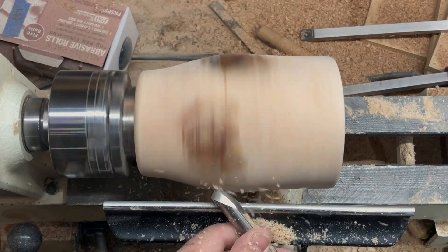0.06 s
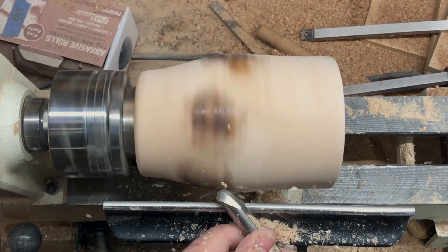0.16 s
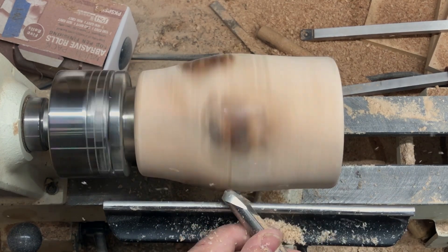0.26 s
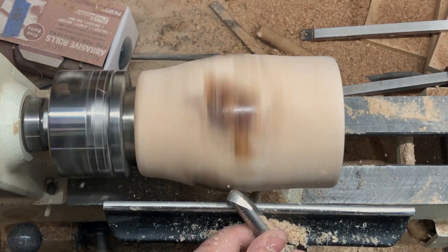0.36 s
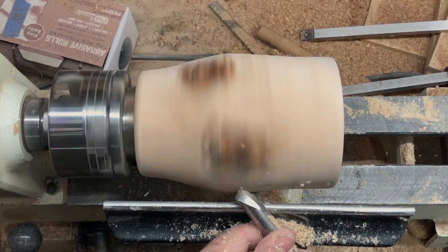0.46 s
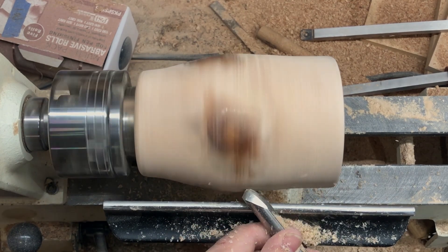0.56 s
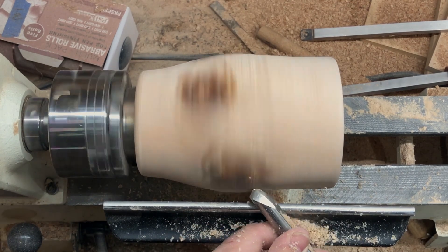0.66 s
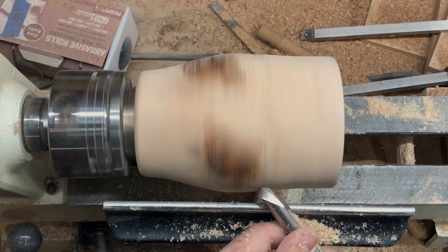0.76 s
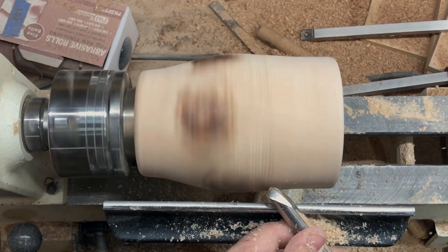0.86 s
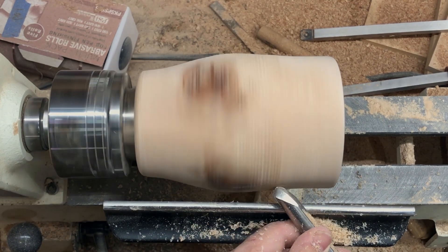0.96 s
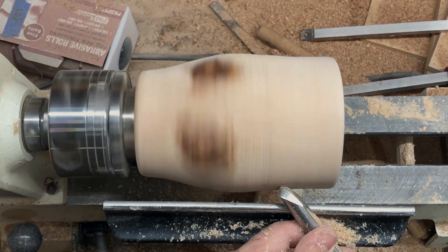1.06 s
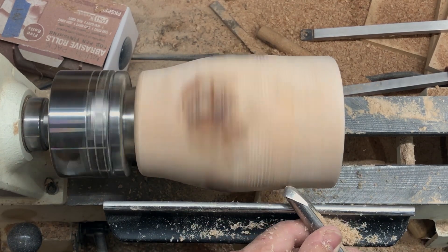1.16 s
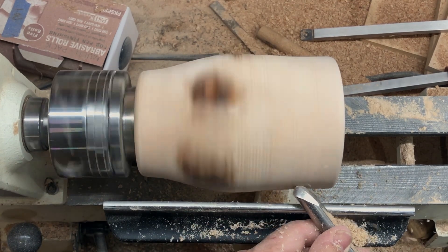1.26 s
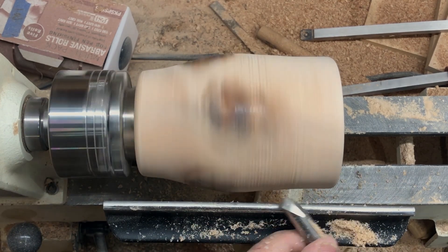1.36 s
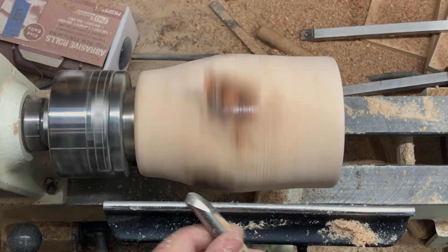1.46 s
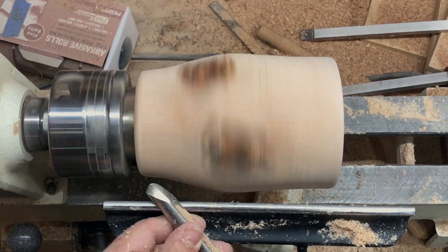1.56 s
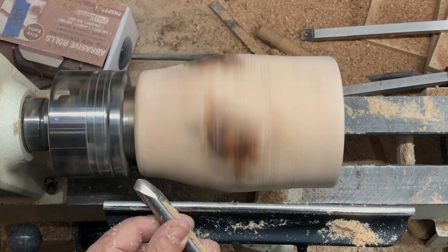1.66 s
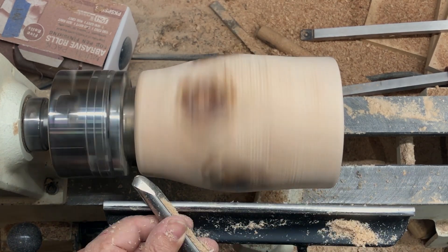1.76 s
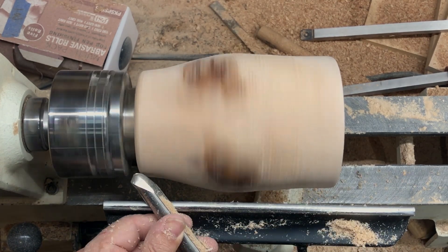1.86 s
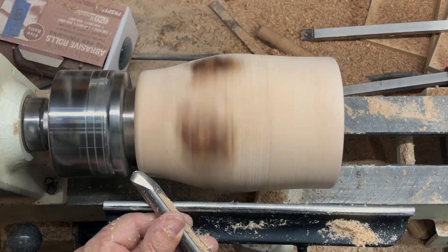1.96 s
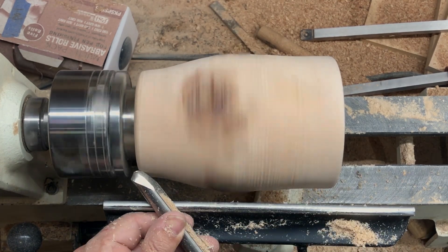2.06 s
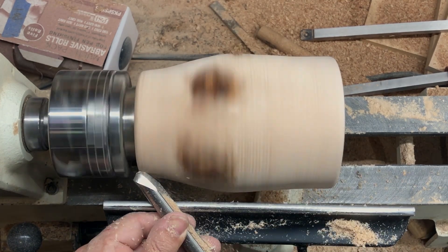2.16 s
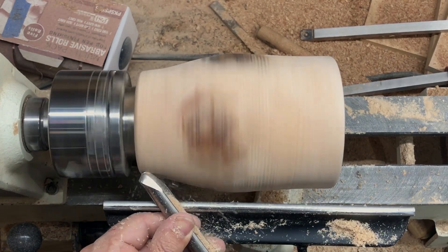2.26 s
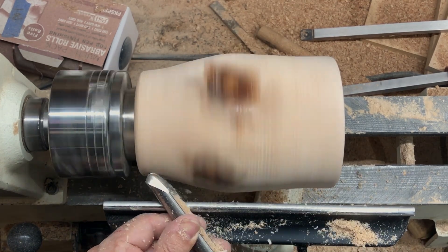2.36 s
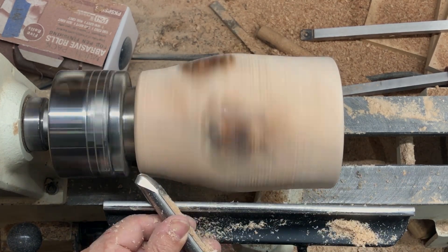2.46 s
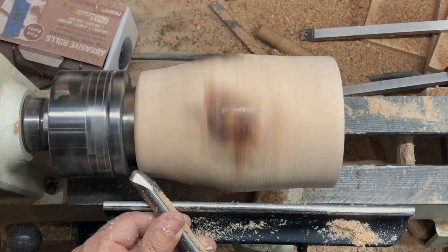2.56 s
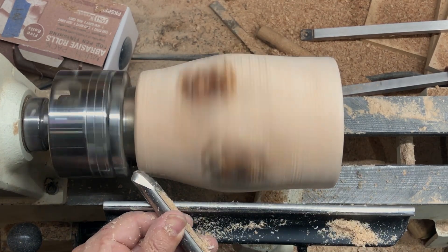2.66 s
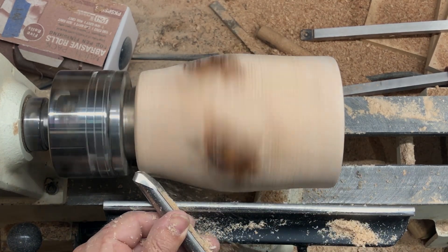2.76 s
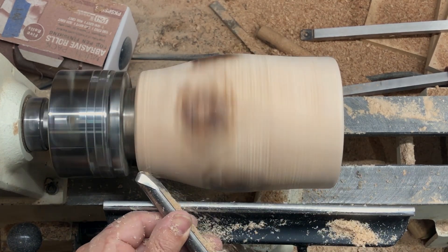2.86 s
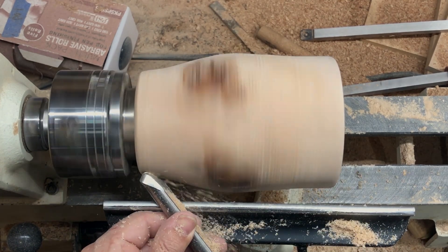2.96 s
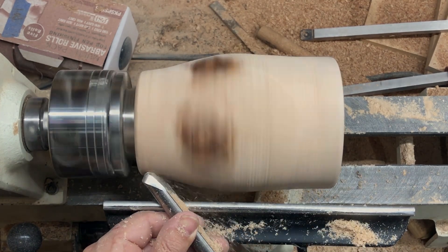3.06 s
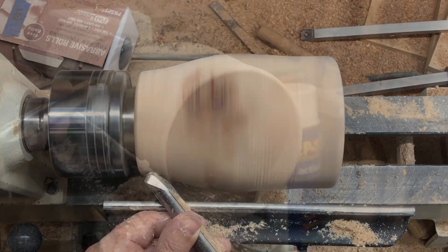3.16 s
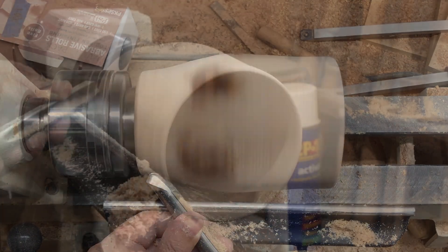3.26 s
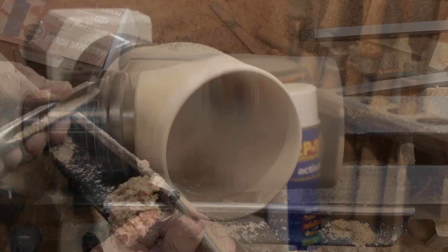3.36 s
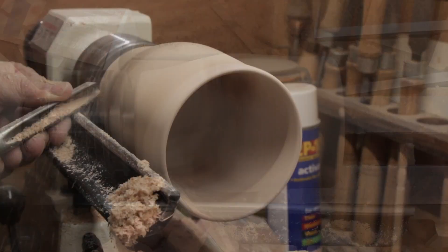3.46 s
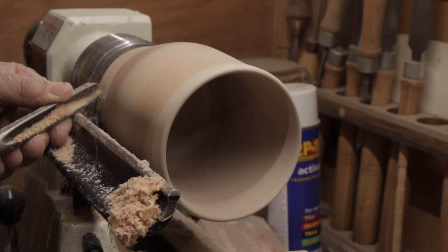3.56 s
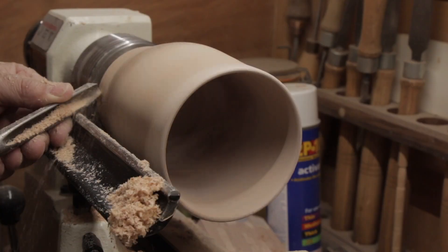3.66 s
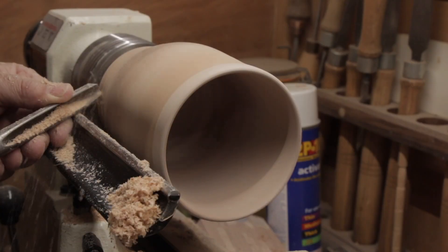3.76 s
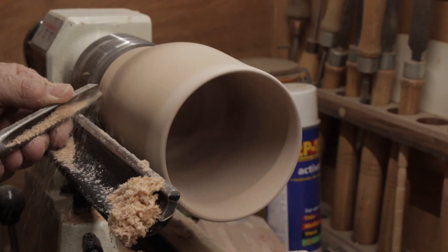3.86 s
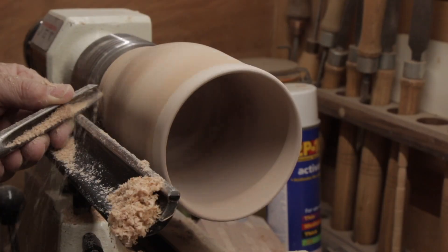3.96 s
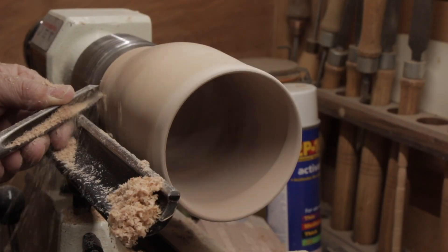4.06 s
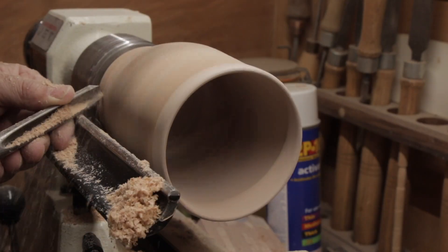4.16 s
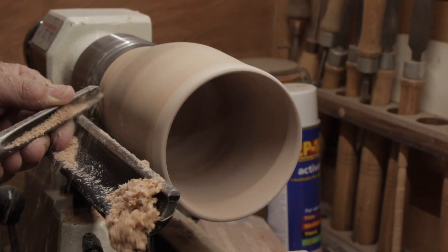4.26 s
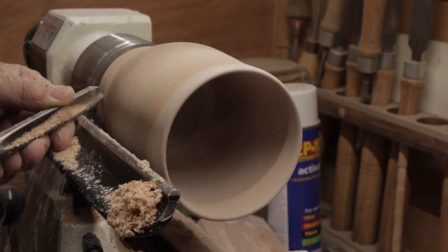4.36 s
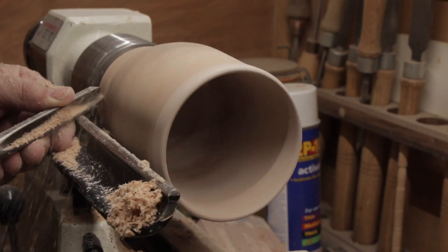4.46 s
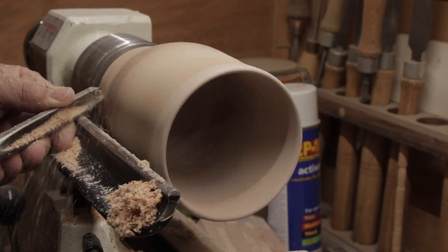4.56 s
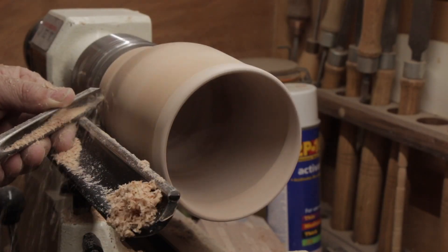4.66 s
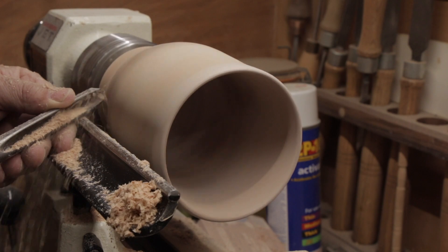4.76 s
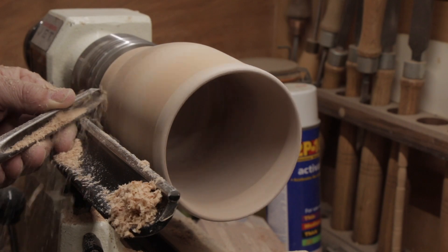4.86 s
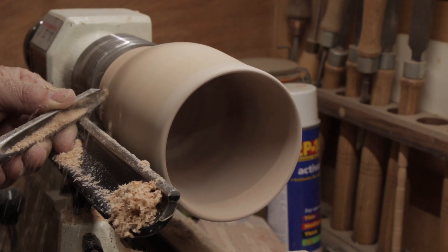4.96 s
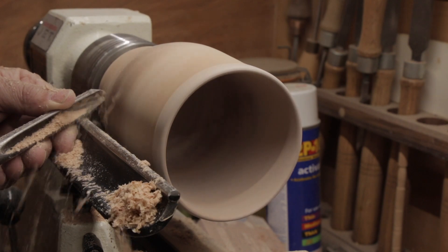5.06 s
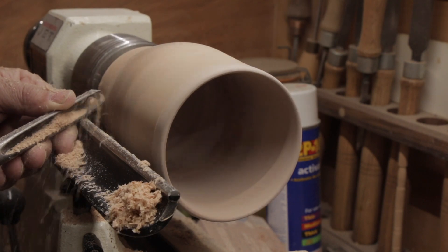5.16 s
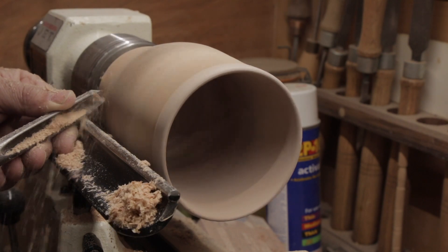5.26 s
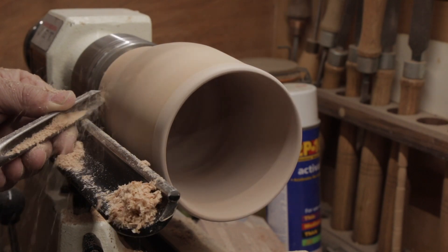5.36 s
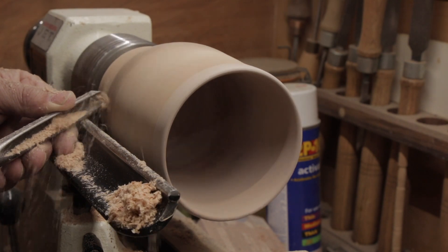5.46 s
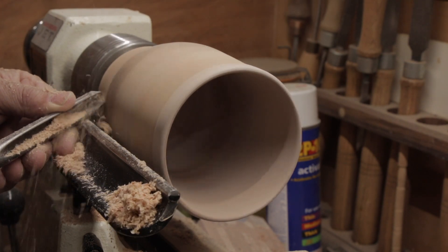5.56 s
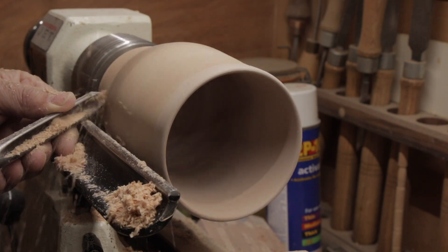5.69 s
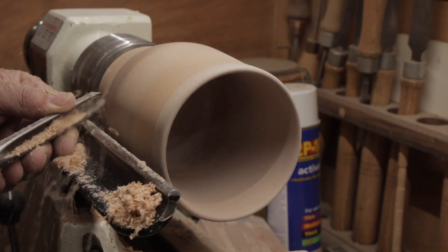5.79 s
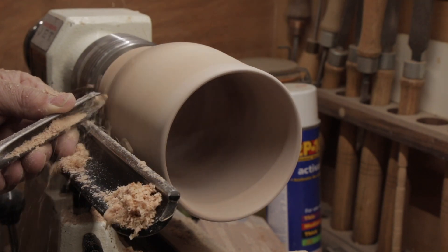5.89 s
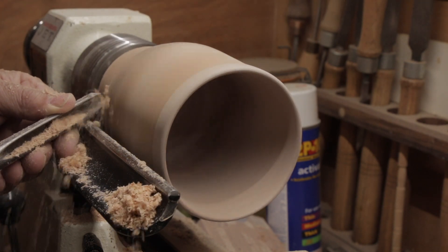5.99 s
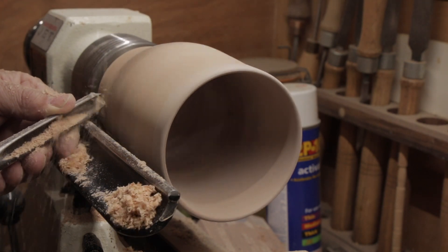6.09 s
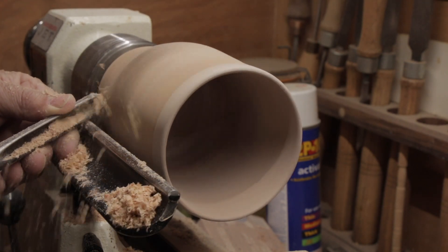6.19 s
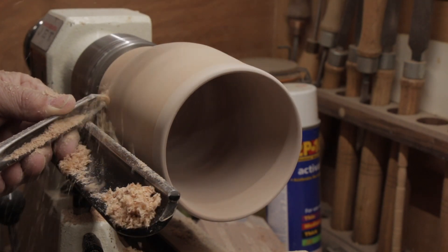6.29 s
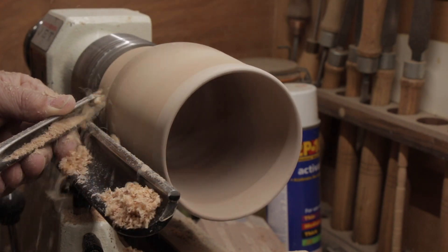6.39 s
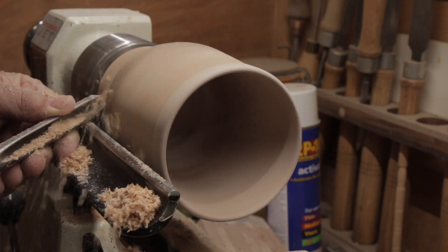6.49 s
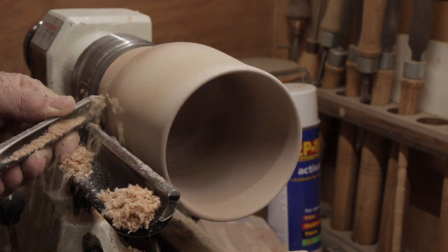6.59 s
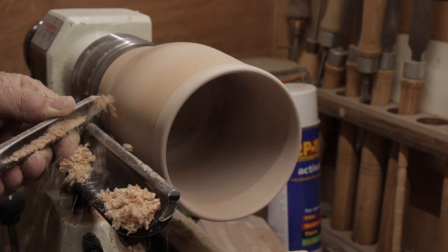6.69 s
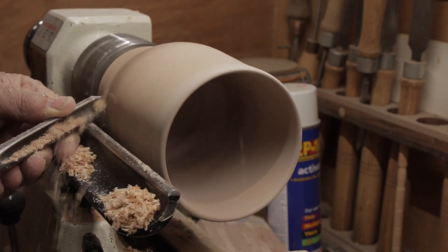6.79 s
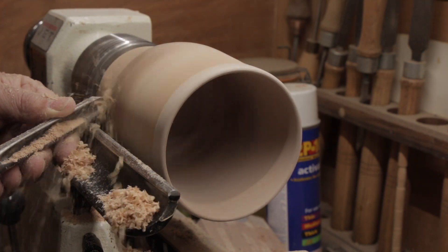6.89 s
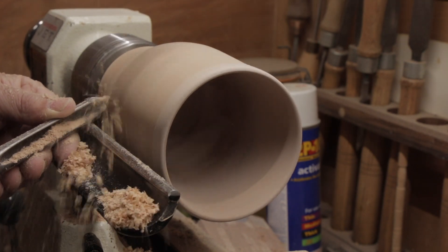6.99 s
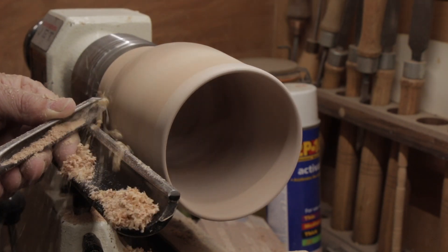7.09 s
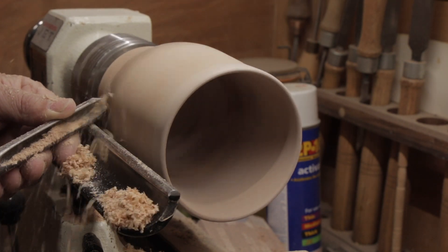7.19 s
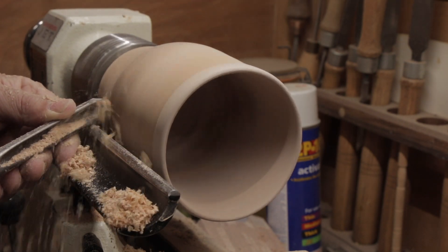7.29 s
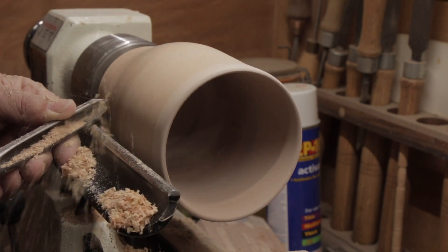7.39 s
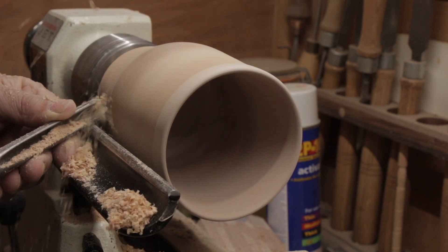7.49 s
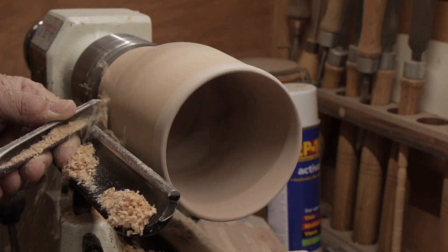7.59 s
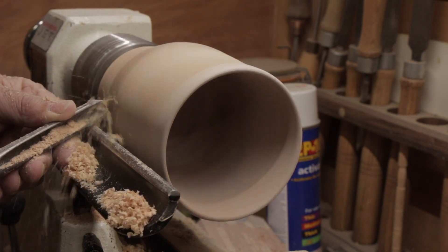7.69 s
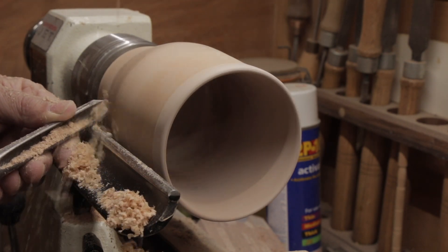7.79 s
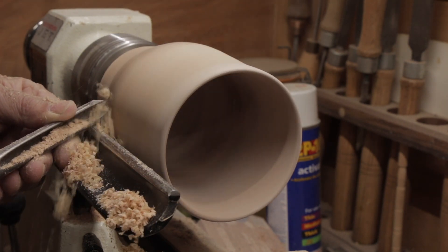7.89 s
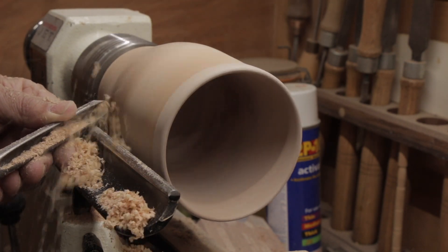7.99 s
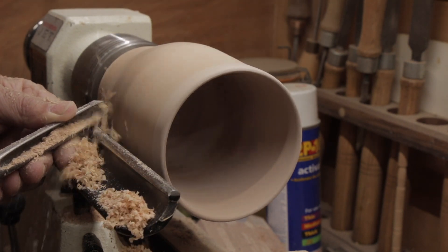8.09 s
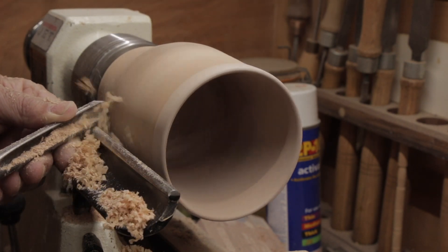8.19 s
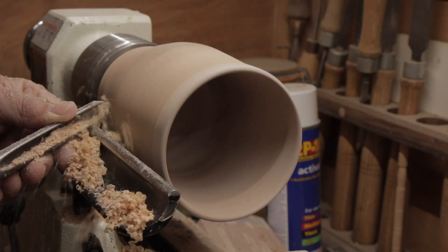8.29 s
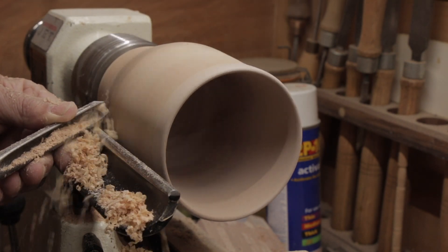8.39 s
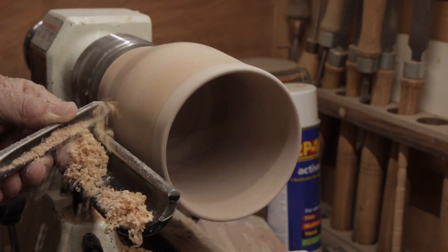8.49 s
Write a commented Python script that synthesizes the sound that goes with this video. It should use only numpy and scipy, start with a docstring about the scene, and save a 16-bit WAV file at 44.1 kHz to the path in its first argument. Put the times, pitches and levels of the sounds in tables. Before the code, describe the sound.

Fluttering wood shaving over a low motor hum, a quiet pause with faint scrapes, then a growing, hissing, squeaky cut on a thin hollow vessel.

```python
"""In a small workshop, a gouge shapes a knotty, hollowed wooden vessel on a lathe: first from above the lathe,
where it shaves the outside, beating once a turn, lifts off, brushes the wood and skims it twice. The place fades
over to one by the open end, where a long, deepening cut makes the thin wall ring and chatter, with squeaks.
Random snaps of wood fibre drive resonances of vessel, gouge and rest; knots and chips are struck modes.
Sine tones and filtered noise make the motor's mains hum, whine and rumble; a faint tail makes the room."""
import sys
import numpy as np
from scipy import signal
from scipy.fft import rfft, irfft, next_fast_len
from scipy.io import wavfile
from scipy.ndimage import uniform_filter1d

SR = 44100
rng = np.random.default_rng(int(sys.argv[2]) if len(sys.argv) > 2 else 0)


def transcribe(u):
    """Save the signal u as a 16-bit wav file named by the first command-line argument.

    u: samples, shape (n,) or (channels, n), limited to [-1, 1]; the rate is SR.
    q: integer samples, one column per channel.
    """
    v = np.clip(np.atleast_2d(u).T, -1, 1)
    q = np.round(v * 32767).astype(np.int16)
    wavfile.write(sys.argv[1], SR, q)


N = 376613

# mains hum at each place: multiple of the mains buzz, above_level_db, open_end_level_db
HUM_LEVELS = [(1, -39.5, -36.5), (2, -72, -82)]
# broad colour of bearings and fan: frequency_hz, colour_db
RUMBLE_COLOUR = [(25, -5.5), (60, 1), (180, -1.5), (400, -2.5), (900, -2), (1400, -4.5), (2000, -13.5),
                 (3300, -17.5), (4500, -26), (9500, -33.5), (15000, -42)]
# housing shaken by the rumble: frequency_hz, width_hz, above_lift_db, open_end_lift_db
HOUSING_MODES = [(247.5, 29, 15, 7.5), (353, 28, 10, 16), (572, 22, 6, 13), (734, 42, 14, 3),
                 (834, 56, -3.5, 14), (1860, 30, 7, 0), (5220, 200, 6.5, 2), (6130, 110, 7, 0),
                 (8900, 900, 5, 0)]
# faint tones of belt and bearings: pitch_hz, above_level_db, open_end_level_db
BELT_AND_BEARING_TONES = [(359, -64.5, -64), (478, -68.5, -74.5), (756, -67.5, -85), (905, -78.5, -86),
                          (1145, -83.5, -93), (1383, -78.5, -90)]
# the whine dips briefly: centre_s, half_length_s, change_db
WHINE_DIPS = [(2.03, 0.019, -18)]

# broad colour of each kind of cut: frequency_hz, colour_db
FOOT_COLOUR = [(50, -20.5), (170, 0), (300, -5), (450, -25), (900, -31), (2000, -27), (2500, -14.5),
               (4200, -11.5), (5000, -1.5), (8500, -2), (10000, -8.5), (13000, -12.5), (15500, -13.5)]
BELLY_COLOUR = [(50, -20), (170, 11), (300, 8.5), (450, -22), (900, -25), (2000, -11.5), (2500, -9),
                (4200, -3), (5000, -5.5), (8500, -9), (10000, -10), (13000, -16), (15500, -13.5)]
SKIM_COLOUR = [(50, -31), (500, -5), (1000, -5.5), (1450, -10), (1700, 2), (2500, -20.5), (4000, -12.5),
               (5500, -10.5), (9000, -4.5), (10000, -11.5), (13000, -13), (15500, -15)]
LONG_COLOUR = [(50, 8.5), (170, -2.5), (310, -5.5), (430, -14), (900, -21), (1400, -3), (2200, -2.5),
               (3000, -1), (4500, -3), (5300, 1), (8000, -2.5), (10000, -5), (12500, -6.5), (15500, -12.5)]
# resonances of vessel, gouge and rest at each contact place: frequency_hz, width_hz, lift_db
FOOT_MODES = [(688, 70, 14.5), (1120, 69, 10), (1600, 32, 5.5), (1940, 45, -1), (2342, 37, 15),
              (2844, 180, 14), (3530, 110, 10), (4090, 98, 7.5), (4800, 50, 8), (5180, 97, -1.5),
              (6280, 40, 4.5), (6950, 91, 10), (10900, 97, 3), (12900, 380, 5.5)]
BELLY_MODES = [(735, 66, 40), (1094, 110, 6.2), (1380, 92, 11.4), (1580, 16, 7.1), (1810, 48, 7.7),
               (2300, 120, 9.3), (2800, 31, 3.9), (3580, 138, 5.6), (4330, 30, 2.6), (4720, 210, 6.5),
               (5600, 150, 7.9), (6400, 50, 5.9), (6870, 97, 8.4), (7440, 50, 5), (8440, 180, 9.1),
               (11900, 178, 6.2)]
SKIM_MODES = [(555, 22, 15), (1847, 20, 7), (2430, 150, 19.7), (2834, 165, 24), (3586, 123, 24.6),
              (4440, 230, 11.8), (4730, 230, 12.8), (5900, 210, 5.7), (6400, 36, 7.4), (7320, 52, 8.9),
              (8700, 69, 2.2)]
LONG_MODES = [(214.6, 39, 12.7), (269, 30, 8.7), (446, 30, 5.7), (625, 47, 10.7), (793, 42, 17.4),
              (998, 31, 6), (1111, 76, 6.7), (1596, 37, 9.1), (1867, 32, 11.9), (2010, 28, 12),
              (2357, 69, 11.5), (2530, 30, 4.2), (2770, 74, 10.2), (3340, 96, 13.4), (3538, 56, 10.7),
              (3727, 90, 9.9), (4000, 60, 6.7), (4195, 85, 5), (4590, 80, 2.5), (4702, 190, 20.7),
              (5574, 52, 7.2), (6104, 95, 6.1), (6910, 66, 8.6), (7450, 120, 7.6), (7990, 100, 6.1),
              (9130, 440, 5.1), (11750, 300, 3)]
# resonances rung only by the rubbing bevel: frequency_hz, width_hz, lift_db
BEVEL_MODES = [(2150, 26, 9.5), (2550, 27, 14.5)]

# the edge catches on hard grain or skips over a hollow: centre_s, half_length_s, extra_load_db
CATCHES = [(0.084, 0.003, 8.5), (0.123, 0.006, 6), (0.172, 0.004, 6.5), (0.195, 0.005, 0), (0.29, 0.003, 3),
           (0.355, 0.006, 4), (0.571, 0.005, 0), (0.714, 0.005, -3), (0.724, 0.003, 6), (0.769, 0.004, 2),
           (1.092, 0.008, 1.5), (1.327, 0.009, -2), (2.02, 0.009, -5), (2.215, 0.009, -4.5),
           (5.256, 0.002, -1), (6.57, 0.003, 4.5), (7.358, 0.003, 2), (8.102, 0.003, 5.5)]
# low spots where the gouge loses its bite: start_s, end_s, angle_turns, gap_depth_db
LOW_SPOTS = [(-0.1, 0.482, 0.57, 4), (0.45, 0.856, 0.31, 5), (0.857, 1.335, 0.36, 8.5),
             (1.997, 3.399, 0.67, 2)]
# light touches: start_s, end_s, entry_and_exit_s, settled_scrape_db
SKIMS = [(1.487, 1.53, 0.018, -68), (1.985, 2.412, 0.021, -42), (2.611, 3.597, 0.029, -40)]
# shaving cut: time_s, thrust on the tool rest level_db, scrape of the edge level_db
SHAVING_COURSE = [(0, -54.5, -36.5), (0.19, -44, -32.5), (0.42, -46.5, -35.5), (0.65, -50.5, -36.5),
                  (1.0, -60, -38.5), (1.27, -53, -36.5), (1.33, -57, -42)]
# a knot knocks against the edge: time_s, thump_peak_db, hollow_knock_peak_db
KNOT_KNOCKS = [(0.202, -31.5, -50), (0.355, -39, -42), (0.437, -39, -50), (5.735, -39, -48),
               (6.354, -31, -34), (6.476, -34, -46), (6.927, -35, -35), (6.969, -37, -34),
               (7.114, -36, -38), (7.259, -47, -44), (7.296, -38, -33), (7.381, -39, -30),
               (7.557, -38, -44), (7.748, -41.5, -40), (7.989, -36, -31), (8.075, -31.5, -36),
               (8.115, -31.5, -42), (8.243, -28, -35), (8.281, -42, -31), (8.477, -32, -33),
               (8.502, -32, -38)]
# a brittle chip snaps off: time_s, pitch_hz, width_hz, peak_db
CHIP_SNAPS = [(0.722, 5500, 4500, -25.5), (1.504, 3000, 500, -56), (5.254, 3760, 260, -13)]
# the edge slips: centre_s, half_length_s, pitch_hz, peak_db
EDGE_CHIRPS = [(1.505, 0.003, 9100, -73), (1.511, 0.007, 4520, -72), (1.325, 0.003, 3300, -38)]
# the shaving squeaks along the flute: start_s, end_s, pitch_hz, width_hz (of each of two passes),
# level_db, angle_turns
FLUTE_SQUEAKS = [(3.49, 6.45, 8960, 700, -57.5, 0.83), (5.1, 6.5, 6160, 330, -50.5, 0.67),
                 (5.1, 6.45, 11400, 1300, -58, 0.15), (5.42, 5.54, 6900, 900, -40, 0.71),
                 (6.3, 6.8, 11700, 700, -51, 0.64), (6.42, 6.75, 7500, 1000, -56, 0.74),
                 (6.947, 7.42, 7150, 1000, -44.5, 0.76), (6.95, 7.45, 10800, 450, -51.5, 0.074),
                 (7.85, 8.7, 7000, 1000, -48, 0.53), (7.85, 8.7, 10700, 160, -61, 0.47),
                 (8.06, 8.31, 5960, 700, -44, 0.62)]
# the hand during the long cut: time_s, cut_depth_db, bevel_pressure_db
LONG_CUT_HAND = [(3.36, -24.5, -3.5), (3.6, -16, -2.5), (4.4, -13.5, -0.5), (4.8, -11, 0.5), (5.3, -8, -1),
                 (5.75, -4.5, -2.5), (6.25, -2.5, -4.5), (7.2, -1, -7), (8.54, -0.5, -10.5)]
# the hand pushes in or eases off: centre_s, half_length_s, extra_depth_db
HAND_PUSHES = [(5.98, 0.11, -2), (6.35, 0.039, 1.5), (6.55, 0.06, 0), (6.79, 0.07, -2), (6.94, 0.087, 3.5),
               (7.35, 0.085, 2.5), (7.73, 0.022, 2), (8.01, 0.044, 2.5), (8.25, 0.041, 2),
               (8.42, 0.031, -0.5), (8.53, 0.074, 0.5)]
# the chatter flares up or breaks off: centre_s, half_length_s, change_db
CHATTER_FLARES = [(4.08, 0.01, -14), (4.28, 0.059, 3), (4.38, 0.024, -16), (4.96, 0.036, -6),
                  (5.72, 0.081, -5), (6.91, 0.015, 5.5), (6.975, 0.0091, 9), (7.05, 0.01, -8),
                  (7.14, 0.08, 5), (7.232, 0.0048, -25), (7.37, 0.11, 4.5), (7.5, 0.021, -10),
                  (8.45, 0.098, -1)]
# how each sound follows the hand: level_db, dB per dB of depth, dB per dB of pressure
THRUST_LAW = (-44.5, 1.33, 0.0)
DRUM_LAW = (-47.5, 1, 0.22)
BEVEL_LAW = (-43, 0.02, 1.0)
WALL_LAW = (-26.5, 0.34, 1.0)
HISS_LAW = (-32.5, 0.64, 0.5)
CHATTER_LAW = (-28.8, 0.25, 0.5)

TIME = np.arange(N) / SR
SIZE = next_fast_len(N + SR // 2)
HZ = np.maximum(np.arange(SIZE // 2 + 1) * SR / SIZE, 1)

FADE_START_S, FADE_END_S = 3.146, 3.52   # from above the lathe to the open end
ROOM_T60_S, ROOM_DB = 0.08, -14
CUTOFF_HZ = 15750
BUZZ_HZ, WHINE_HZ = 120.01, 1256
END_HUM_LAG_TURNS = 0.45   # the hum arrives nearly opposed at the open end
WHINE_DB, WHINE_SHAVING_DB, WHINE_SKIMMING_DB = -56, -9.5, -1.5   # level, then change under each load
DRIVE_WAVER_HZ, DRIVE_WAVER_DB = 2.22, 1.9   # typical spread
TOP_TURNS_PER_S, END_TURNS_PER_S = 25.6, 24.8
SPOT_BLEND_S = 0.026
GAP_SHARPNESS = 1.72   # higher makes the gap a shorter part of the turn
LIFT_OFF_S, LIFT_OFF_TAKES_S = 1.345, 0.012
SHAVE_RING_DB, SHAVE_HISS_DB = -4, -1   # relative to the scrape
SKIM_RING_DB, SKIM_HISS_DB = -1, -2.5   # relative to the scrape
SETTLE_DB, SETTLE_S = 15, 0.094   # the edge lands this much softer, then settles in
LANDING_DB, LANDING_S = 10, 0.024   # it bumps as it lands
THUMP_HZ, THUMP_WIDTH_HZ = 222, 140   # width of each of two passes
KNOCK_HZ, KNOCK_WIDTH_HZ = 666, 460   # width of each of two passes
SQUEAK_FADE_S, SQUEAK_SHARPNESS = 0.082, 2.1
PUSH_PRESSES = 0.69   # dB of pressure per dB of a push
# where in the turn the long cut bites, shoves and sings most
HIGH_SPOT_TURNS, SHOVE_TURNS, CHATTER_TURNS = 0.66, 0.4, 0.29
SHOVE_BEAT_DB, CHATTER_BEAT_DB = 1.6, 2.67
CHATTER_HZ, CHATTER_WIDTH_HZ = 2906, 52
CHATTER_LIMIT = 0.3   # how strongly friction limits the wall's swing
CHATTER_FLICKER_DB, CHATTER_FLICKER_PER_S = 1.33, 110


def from_db(db):
    """Decibels to gain."""
    return 10 ** (np.asarray(db) / 20)


def rms_one(x):
    """Scale to unit power."""
    return x / np.sqrt(np.mean(x ** 2) + 1e-20)


def in_time(rows):
    """Each column of a curve, sample by sample."""
    time_s, *columns = np.transpose(rows)
    return [np.interp(TIME, time_s, column) for column in columns]


def swells(rows):
    """Smooth rises and falls in dB, from rows of centre_s, half_length_s, change_db."""
    return sum(db * np.exp(-np.minimum(((TIME - s) / length) ** 2, 20)) for s, length, db in rows)


def drift(rate):
    """Smooth chance with about `rate` new values a second; spread 1."""
    pole = np.exp(-40 * np.pi * rate / SR)   # worked out at every 20th sample
    noise = rng.standard_normal(N // 20 + 4002)
    slow = signal.lfilter([1], [1, -2 * pole, pole * pole], noise)[4000:]
    return np.interp(np.arange(N) / 20, np.arange(len(slow)), rms_one(slow))


def once_a_turn(turns_per_s, angle, sharpness):
    """A smooth pulse of height 1 each time one place on the wood comes round."""
    return np.exp(sharpness * (np.cos(2 * np.pi * (turns_per_s * TIME - angle)) - 1))


def contact(start, end, ramp):
    """1 between start and end, with a straight rise and fall inside them."""
    return np.clip((TIME - start) / ramp, 0, 1) * np.clip((end - TIME) / ramp, 0, 1)


def filtered(x, response):
    """Pass a sound through a frequency response."""
    return irfft(rfft(x, SIZE) * response, SIZE)[:N]


def resonance(hz, width_hz):
    """Response of one damped mode, 1 on top."""
    return 1 / (1 + 1j * ((HZ - hz ** 2 / HZ) / width_hz))


def body(colour, modes):
    """A broad colour with ringing modes standing out of it."""
    points_hz, level_db = np.transpose(colour)
    response = from_db(np.interp(np.log(HZ), np.log(points_hz), level_db))
    for hz, width_hz, lift_db in modes:
        response = response * (1 + (from_db(lift_db) - 1) * resonance(hz, width_hz))
    return response


def band(low_hz, high_hz, order):
    """Gain of one register, sloping away on both sides."""
    return 1 / (1 + (low_hz / HZ) ** order) / (1 + (HZ / high_hz) ** order)


def radiate(force, response, low_hz, high_hz, order=16):
    """What one register of a body gives off under a force; unit power."""
    return rms_one(filtered(force, response * band(low_hz, high_hz, order)))


def strike(response, time_s, peak_db):
    """Sudden blows on a body, each ringing up to its own peak level."""
    blows = np.zeros(N)
    blows[(np.asarray(time_s) * SR).astype(int)] = from_db(peak_db)
    return filtered(blows, response / np.abs(irfft(response, SIZE)).max())


def workshop(x):
    """Shelves and walls scatter a short, faint tail."""
    decay = from_db(-60 * np.minimum(TIME / ROOM_T60_S, 10))
    tail = rng.standard_normal(N) * decay * (TIME > .004)
    tail = tail / np.sqrt(np.sum(tail ** 2))
    return x + from_db(ROOM_DB) * filtered(x, rfft(tail, SIZE))


def rumble(above, by_end):
    """Bearings and fan, as noise, shake the housing, whose modes stand out differently at each place."""
    out = 0
    housing = np.array(HOUSING_MODES)
    for share, modes, level_db in ((above, housing[:, [0, 1, 2]], -59.8), (by_end, housing[:, [0, 1, 3]], -58.3)):
        noise = filtered(rng.standard_normal(N), body(RUMBLE_COLOUR, modes))
        out = out + share * from_db(level_db) * rms_one(noise)
    return out


def drive_tones(above, by_end):
    """Belt and bearings sing faintly, each tone wavering a little."""
    out = 0
    for hz, above_db, end_db in BELT_AND_BEARING_TONES:
        phase = 2 * np.pi * np.cumsum(hz + DRIVE_WAVER_HZ * drift(8)) / SR
        gain = above * from_db(above_db) + by_end * from_db(end_db)
        gain = gain * from_db(DRIVE_WAVER_DB * drift(7.3))
        out = out + gain * np.sqrt(2) * np.sin(phase)
    return out


def drive_whine(above):
    """A wavering tone of the drive, heard above the lathe, which fades under load."""
    shaving_load = contact(-.1, LIFT_OFF_S, LIFT_OFF_TAKES_S)
    skimming_load = sum(contact(start, end, SETTLE_S) for start, end, _, _ in SKIMS)
    level_db = WHINE_DB + WHINE_SHAVING_DB * shaving_load + WHINE_SKIMMING_DB * skimming_load
    level_db = level_db + swells(WHINE_DIPS) + 0.656 * drift(14)
    phase = 2 * np.pi * np.cumsum(WHINE_HZ + 1.4 * drift(11.6)) / SR
    return above * from_db(level_db) * np.sqrt(2) * np.sin(phase)


def mains_hum(above, by_end):
    """Steady hum and its octave; nearly opposed at the two places, it almost cancels during the fade."""
    out = 0
    for multiple, above_db, end_db in HUM_LEVELS:
        angle = 2 * np.pi * multiple * BUZZ_HZ * TIME
        hum_above = above * from_db(above_db) * np.sin(angle)
        hum_by_end = by_end * from_db(end_db) * np.sin(angle - 2 * np.pi * END_HUM_LAG_TURNS)
        out = out + np.sqrt(2) * (hum_above + hum_by_end)
    return out


def motor(above, by_end):
    """The running lathe: bearing rumble, drive tones, whine and mains hum."""
    return rumble(above, by_end) + drive_tones(above, by_end) + drive_whine(above) + mains_hum(above, by_end)


def chirps():
    """Single, very short squeals as the edge slips."""
    out = np.zeros(N)
    for s, length, hz, peak_db in EDGE_CHIRPS:
        near = np.abs(TIME - s) < 4 * length
        t = TIME[near] - s
        out[near] += from_db(peak_db) * np.exp(-(t / length) ** 2) * np.sin(2 * np.pi * hz * t)
    return out


def snaps():
    """Single chips break away with a sharp tick that rings for a moment."""
    return sum(strike(resonance(hz, width_hz), s, peak_db) for s, hz, width_hz, peak_db in CHIP_SNAPS)


def knocks():
    """Each blow from a knot thumps the tool rest and knocks on the hollow vessel."""
    time_s, thump_db, knock_db = np.transpose(KNOT_KNOCKS)
    wood = body(LONG_COLOUR, LONG_MODES)
    thump = strike(wood * resonance(THUMP_HZ, THUMP_WIDTH_HZ) ** 2, time_s, thump_db)
    knock = strike(wood * resonance(KNOCK_HZ, KNOCK_WIDTH_HZ) ** 2, time_s, knock_db)
    return thump + knock


def fibres(load_db, per_s, tear_db):
    """Fibres snap at random, harder under load and in clumps as chips tear off; slow level evened."""
    breaks = (rng.random(N) < per_s / SR) * rng.standard_normal(N)
    force = breaks * from_db(load_db + tear_db * drift(100))
    slow_power = np.abs(uniform_filter1d(force ** 2, size=SR // 8))
    return force / np.sqrt(slow_power + 1e-12)


def skimming(beat_db):
    """The edge barely brushes the wood, then rides lightly on it twice, settling in each time."""
    wood = body(SKIM_COLOUR, SKIM_MODES)
    force = fibres(beat_db + 0.28 * drift(45) + swells(CATCHES), per_s=10000, tear_db=-1.0)
    ring = radiate(force, wood, 360, 5200)
    hiss = radiate(force, wood, 5100, 19000)
    touch = 0
    for start, end, ramp, scrape_db in SKIMS:
        unsettled = np.exp(-np.maximum(TIME - start, 0) / SETTLE_S)
        bump_db = swells([(start, LANDING_S, LANDING_DB)])
        touch = touch + contact(start, end, ramp) * from_db(scrape_db - SETTLE_DB * unsettled + bump_db)
    return touch * (from_db(SKIM_RING_DB) * ring + from_db(SKIM_HISS_DB) * hiss)


def chips(force, load_db, wood, crackle_db, per_s):
    """Chips hiss off the edge, and single brittle ones crackle, each in a register of its own."""
    edges, crackle = np.geomspace(5200, 17000, num=3), 0
    for low, high in zip(edges, edges[1:]):
        breaks = fibres(load_db, per_s, tear_db=6.5)
        crackle = crackle + filtered(breaks, wood * band(low, high, order=10))
    crackle = rms_one(np.diff(crackle, prepend=0))   # the step between samples brightens it
    return rms_one(radiate(force, wood, 5130, 17000) + from_db(crackle_db) * crackle)


def shaving(beat_db):
    """A firm cut travelling from foot to belly: the rest judders, the vessel drums and rings, chips hiss away."""
    thrust_db, scrape_db = in_time(SHAVING_COURSE)
    load_db = beat_db + 0.17 * drift(45) + swells(CATCHES)
    force = fibres(load_db, per_s=23000, tear_db=1.2)
    push = fibres(0.8 * load_db, per_s=6000, tear_db=1.5)
    travel = np.clip((TIME - .4) / 0.49, 0, 1)   # 0 at the foot, 1 on the belly
    foot, belly = body(FOOT_COLOUR, FOOT_MODES), body(BELLY_COLOUR, BELLY_MODES)
    out = 0
    for wood, share, drum_db in ((foot, 1 - travel, -50), (belly, travel, -49)):
        thrust = from_db(thrust_db) * radiate(push, wood, 48, 546)
        drum = from_db(drum_db) * radiate(push, wood, 460, 2100)
        ring = from_db(scrape_db + SHAVE_RING_DB) * radiate(force, wood, 2200, 5260)
        hiss = from_db(scrape_db + SHAVE_HISS_DB) * chips(force, load_db, wood, crackle_db=-3.5, per_s=4600)
        out = out + share * (thrust + drum + ring + hiss)
    return out * contact(-.1, LIFT_OFF_S, LIFT_OFF_TAKES_S)


def squeaks():
    """Runs of short chirps from the shaving in the flute, once a turn; each run has its own pitch."""
    out, friction = 0, rng.standard_normal(N)
    for start, end, hz, width_hz, level_db, angle in FLUTE_SQUEAKS:
        peak = signal.tf2sos(*signal.iirpeak(hz, hz / width_hz, fs=SR))
        tone = signal.sosfilt(np.vstack([peak, peak]), friction)
        pulsed = rms_one(tone * once_a_turn(END_TURNS_PER_S, angle, SQUEAK_SHARPNESS))
        out = out + from_db(level_db) * contact(start, end, SQUEAK_FADE_S) * pulsed
    return out


def ribbon(load_db, wood, per_s, tear_db, flutter_db, wander_turns):
    """The shaving crackles off; each register pulses once a turn, its angle wandering as the curl shifts."""
    edges, out = np.geomspace(4600, 16500, num=7), 0
    for low, high in zip(edges, edges[1:]):
        turns = END_TURNS_PER_S * TIME - HIGH_SPOT_TURNS + wander_turns * drift(1.0)
        crackle = fibres(load_db + flutter_db * np.cos(2 * np.pi * turns), per_s, tear_db)
        register = signal.butter(2, [low, high], "band", fs=SR, output="sos")
        out = out + signal.sosfilt(register, crackle + 1e-18)
    return radiate(out, wood, 4800, 18700)


def wall_chatter(force, wood):
    """One mode of the wall, near 2.9 kHz, sings out, held in check by friction; it stutters once a turn."""
    swing = radiate(force, wood * resonance(CHATTER_HZ, CHATTER_WIDTH_HZ), 2640, 3400)
    recent_power = uniform_filter1d(swing ** 2, size=SR // 400)
    swing = swing / (1 + 2 * recent_power) ** CHATTER_LIMIT
    stutter_db = CHATTER_BEAT_DB * np.cos(2 * np.pi * (END_TURNS_PER_S * TIME - CHATTER_TURNS))
    flicker_db = CHATTER_FLICKER_DB * drift(CHATTER_FLICKER_PER_S)
    return from_db(swells(CHATTER_FLARES) + stutter_db + flicker_db) * rms_one(swing)


def follow(law, depth_db, pressure_db):
    """Gain of one sound at a given depth of cut and pressure of the bevel."""
    level_db, per_depth, per_pressure = law
    return from_db(level_db + per_depth * depth_db + per_pressure * pressure_db)


def long_cut(beat_db, end_grain_db):
    """The edge meets the high spot once a turn and end grain twice; rest, vessel, bevel, wall and shaving sound."""
    depth_db, pressure_db = in_time(LONG_CUT_HAND)
    push_db = swells(HAND_PUSHES)
    hand = depth_db + push_db, pressure_db + PUSH_PRESSES * push_db
    wood = body(LONG_COLOUR, LONG_MODES)
    bevel_wood = wood * body([(1000, 0)], BEVEL_MODES)

    angle = 2 * np.pi * (END_TURNS_PER_S * TIME - HIGH_SPOT_TURNS)
    load_db = beat_db * np.cos(angle) + end_grain_db * np.cos(2 * angle) + 1.0 * drift(62) + swells(CATCHES)
    force = fibres(load_db, per_s=20000, tear_db=-0.95)
    shove_db = SHOVE_BEAT_DB * np.cos(2 * np.pi * (END_TURNS_PER_S * TIME - SHOVE_TURNS))
    push = fibres(shove_db + 0.35 * drift(22), per_s=2500, tear_db=0.4)   # lumpy shoves of the thick shaving
    shaving_ribbon = ribbon(0.37 * load_db, wood, per_s=7700, tear_db=1.5, flutter_db=2.0, wander_turns=0.55)

    thrust = follow(THRUST_LAW, *hand) * radiate(push, wood, 86, 375, order=6)
    drum = follow(DRUM_LAW, *hand) * radiate(push, wood, 425, 1342)   # louder as the cut deepens
    bevel = follow(BEVEL_LAW, *hand) * radiate(force, bevel_wood, 1000, 2330)   # rubs behind the edge
    wall = follow(WALL_LAW, *hand) * radiate(force, wood, 2297, 4736)
    hiss = follow(HISS_LAW, *hand) * shaving_ribbon
    chatter = follow(CHATTER_LAW, *hand) * wall_chatter(force, wood)
    return (thrust + drum + bevel + wall + hiss + chatter) * contact(3.246, 9, ramp=0.17) + squeaks()


def scene():
    """The cuts heard from above the lathe, then from beside the open end."""
    by_end = np.clip((TIME - FADE_START_S) / (FADE_END_S - FADE_START_S), 0, 1)
    beat_db = 0
    for start, end, angle, depth_db in LOW_SPOTS:
        gap = once_a_turn(TOP_TURNS_PER_S, angle, GAP_SHARPNESS)
        beat_db = beat_db - depth_db * contact(start, end, SPOT_BLEND_S) * gap
    outside_cuts = np.sqrt(1 - by_end) * (shaving(beat_db) + skimming(beat_db))
    cuts = outside_cuts + long_cut(beat_db=1.0, end_grain_db=1.2)
    at_the_edge = cuts + knocks() + snaps() + chirps()
    return (workshop(at_the_edge) + motor(1 - by_end, by_end))[None]


def record(dry):
    """The microphone signal, with its top cut steeply."""
    low_pass = signal.ellip(12, .1, 90, CUTOFF_HZ, fs=SR, output="sos")
    return signal.sosfilt(low_pass, dry)


dry = scene()
out = record(dry)
transcribe(out)
```